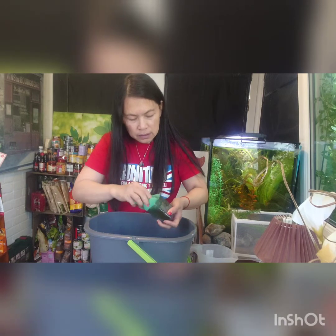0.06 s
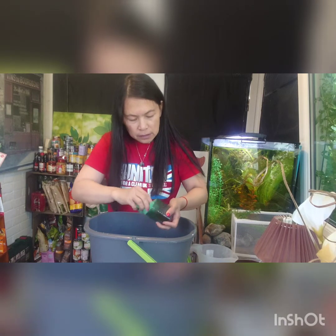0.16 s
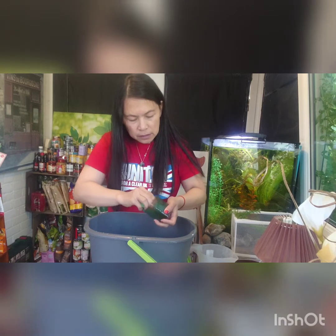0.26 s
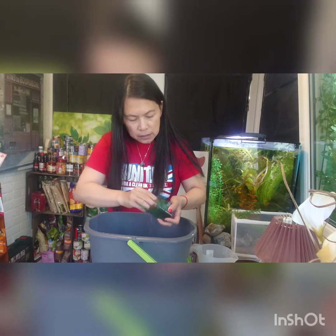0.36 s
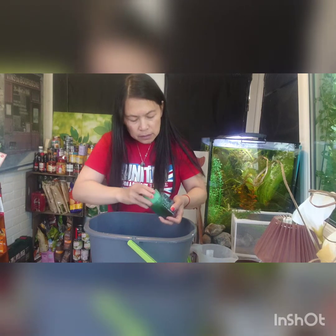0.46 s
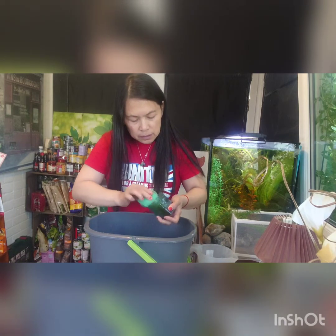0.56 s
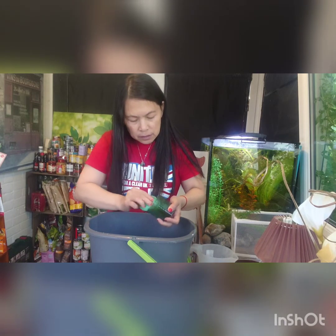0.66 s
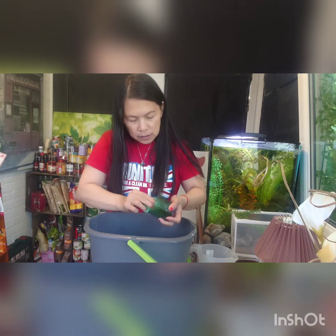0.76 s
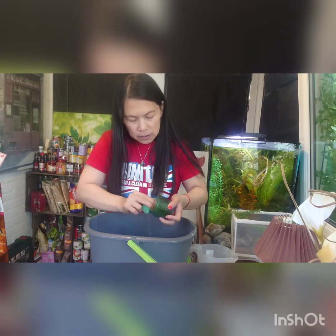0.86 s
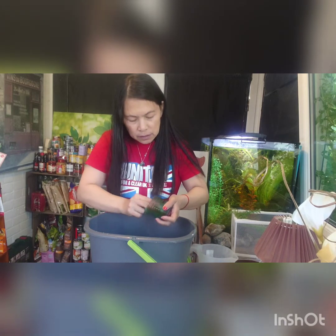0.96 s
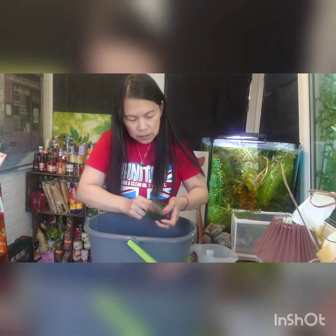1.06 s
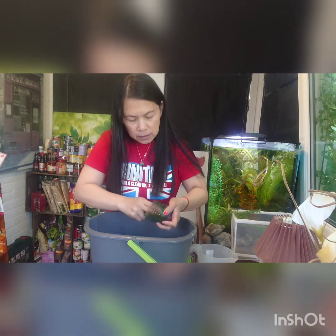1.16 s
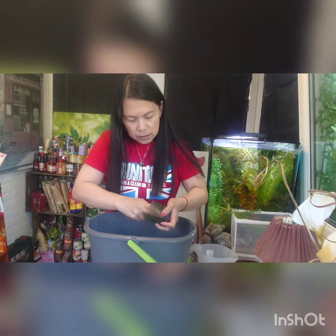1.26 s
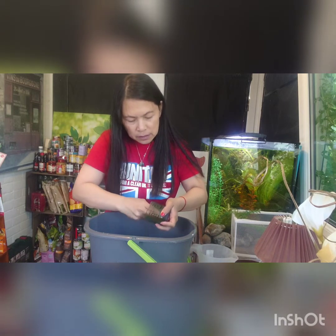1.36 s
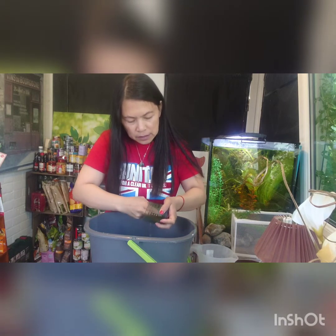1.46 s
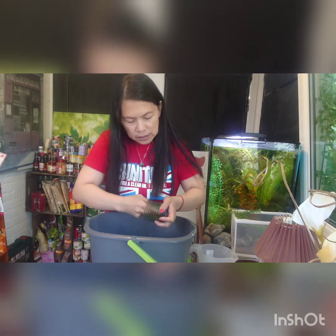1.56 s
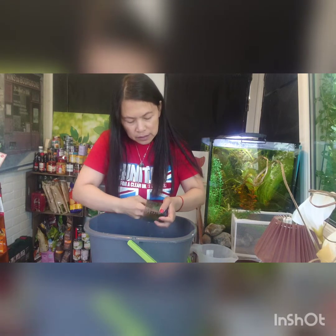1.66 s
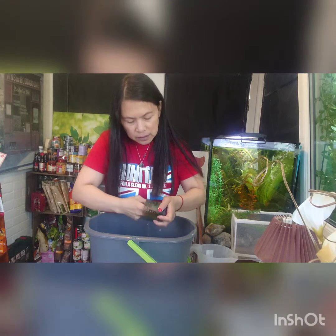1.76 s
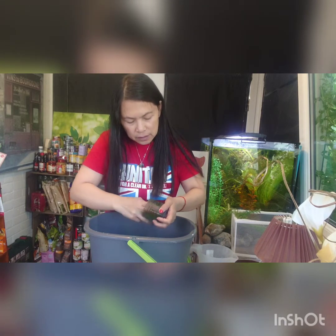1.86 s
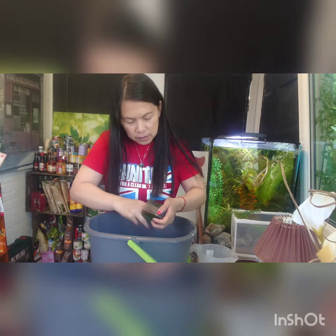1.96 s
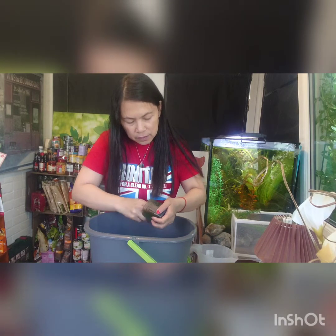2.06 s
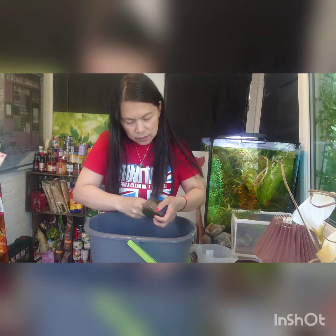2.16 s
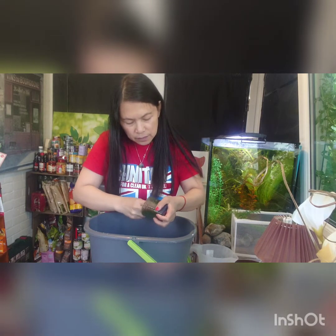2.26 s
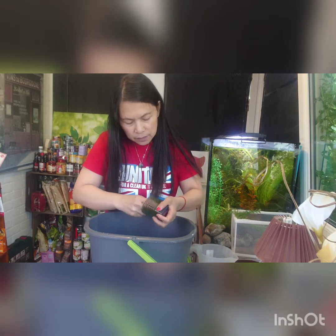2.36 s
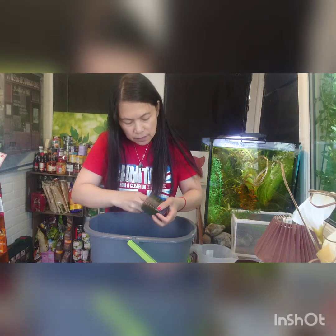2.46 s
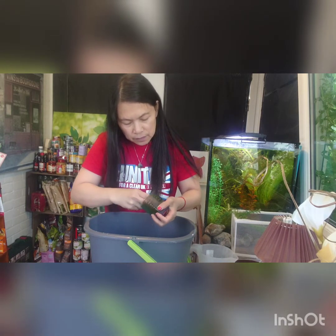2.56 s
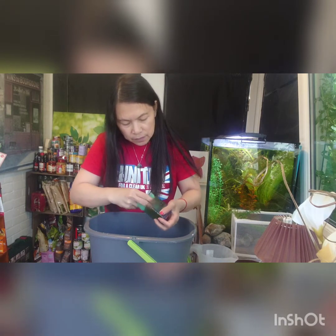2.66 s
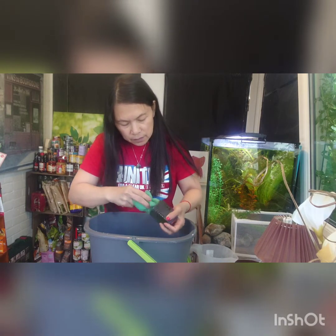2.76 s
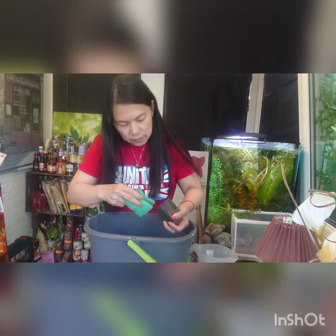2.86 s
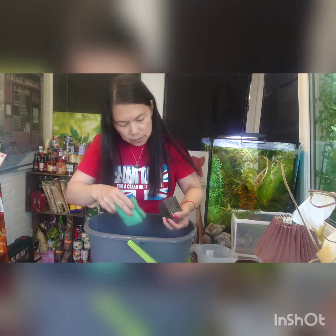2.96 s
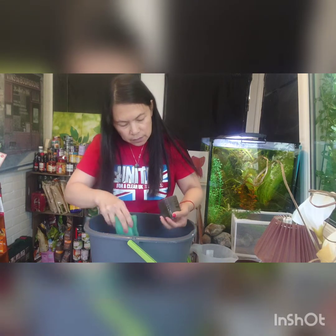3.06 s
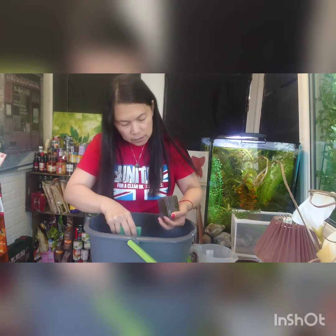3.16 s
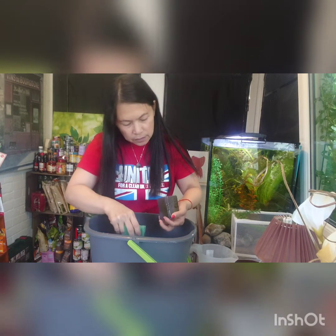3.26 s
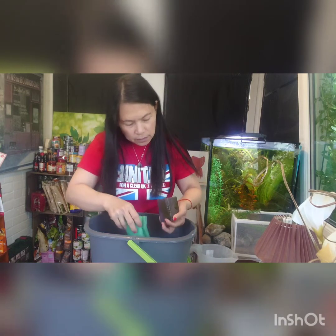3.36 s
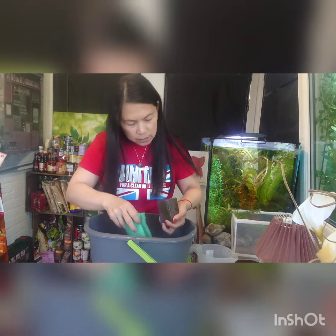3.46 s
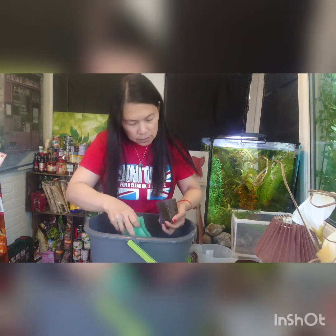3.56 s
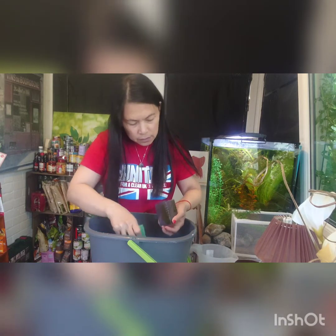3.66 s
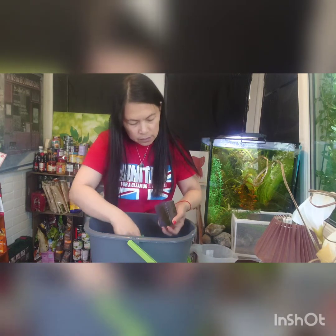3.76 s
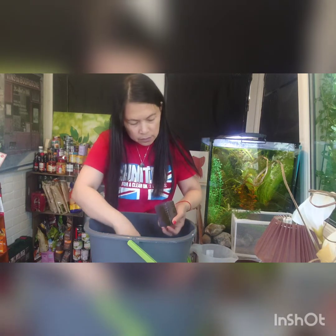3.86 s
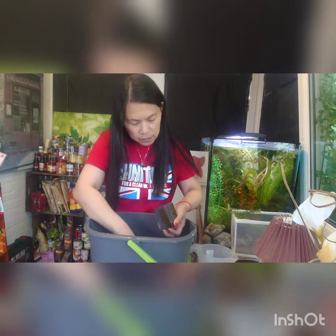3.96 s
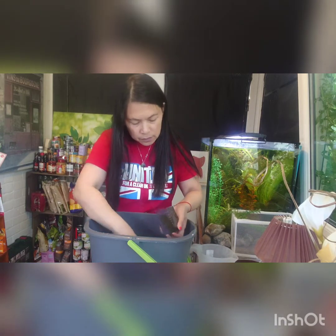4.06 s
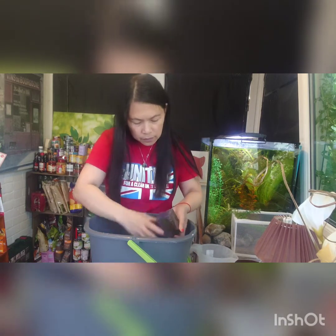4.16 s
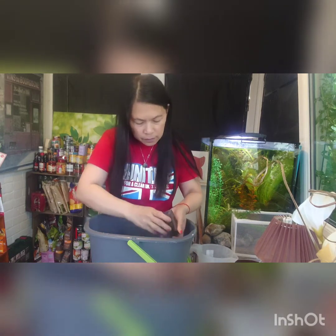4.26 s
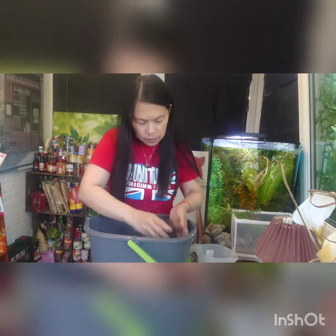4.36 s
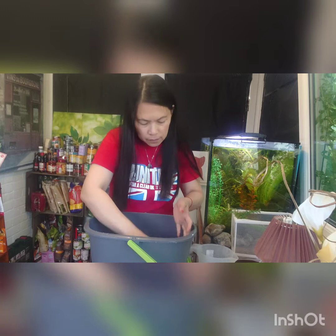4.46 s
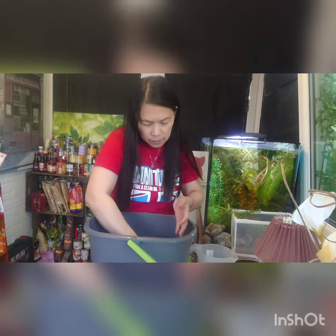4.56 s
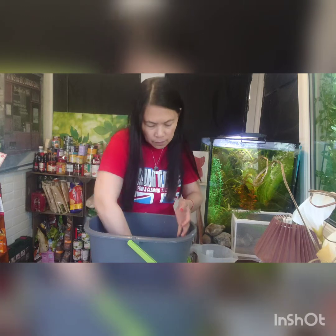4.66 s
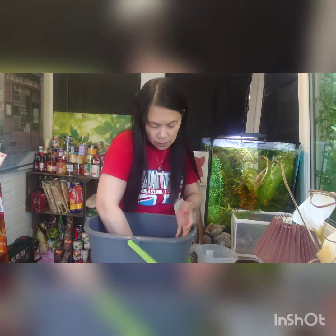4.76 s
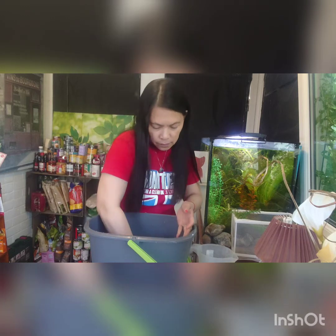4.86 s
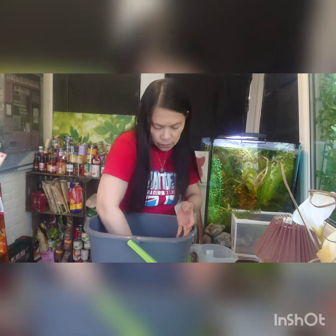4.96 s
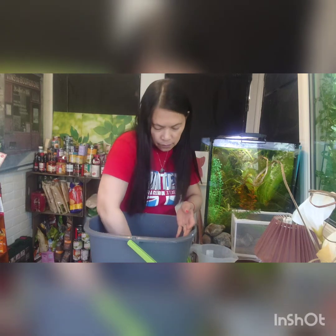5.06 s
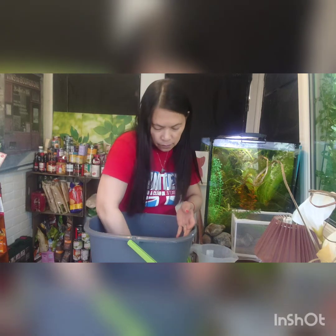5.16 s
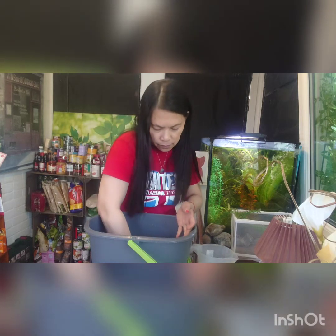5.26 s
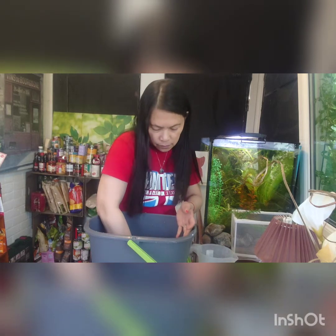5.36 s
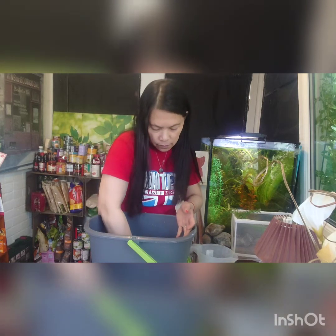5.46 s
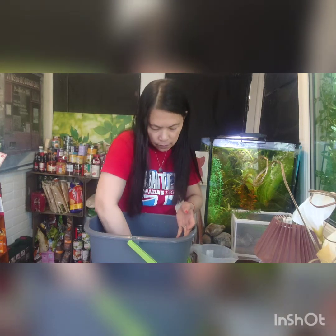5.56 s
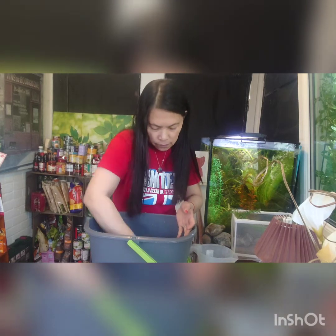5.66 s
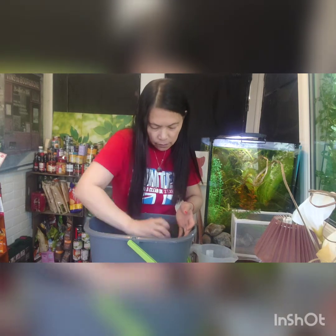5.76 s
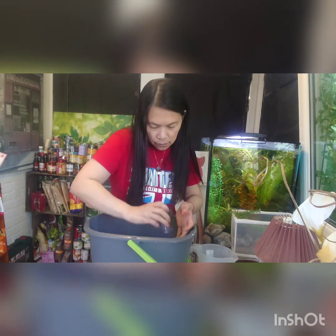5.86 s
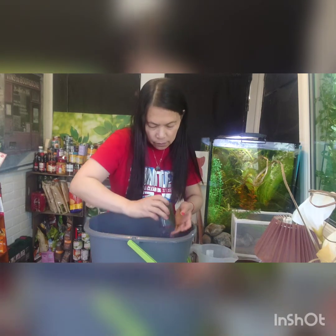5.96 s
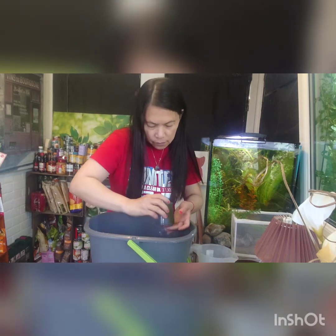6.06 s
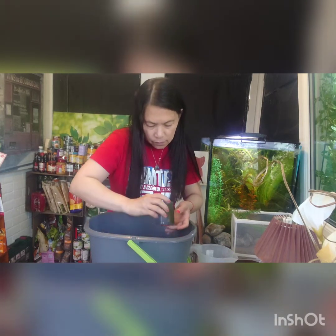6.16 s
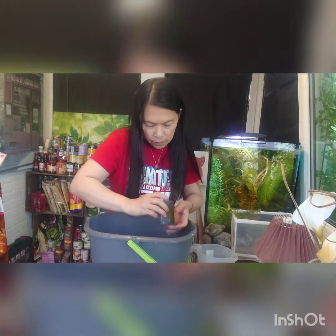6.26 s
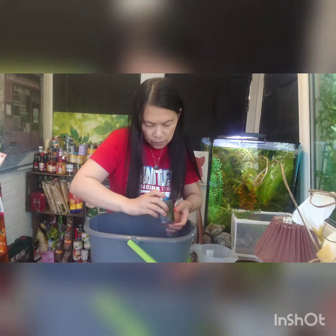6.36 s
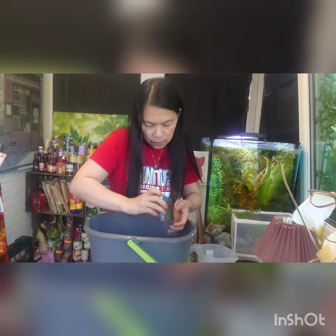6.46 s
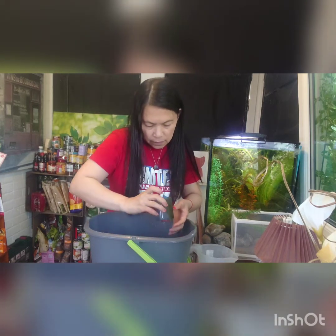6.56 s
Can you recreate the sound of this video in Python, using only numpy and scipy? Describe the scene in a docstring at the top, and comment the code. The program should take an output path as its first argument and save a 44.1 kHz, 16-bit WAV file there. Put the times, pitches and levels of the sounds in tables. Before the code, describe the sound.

Close up in a small furnished room, hands work a wet sponge out of a hollow plastic casing: short ringing knocks, soft squelches, rasps and a few squeaks. After a quieter pause the casing lightly taps the water, then several heavy plunges slosh and gurgle with low bucket thumps. Drips and trickles follow. A bracelet clinks faintly and aquarium pumps hum low throughout.

```python
"""Hands work a wet sponge out of a hollow plastic filter casing: noise through the casing's resonances,
ringing knocks with low thumps, rasps and squeaks. Five plunges into a bucket of water follow, then
dripping: stirred noise, swarms of chirping bubbles and low resonances. A bracelet clinks now and then as
damped high tones. Behind it aquarium pumps hum as steady tones over noise, in a small furnished room."""
import sys
import numpy as np
from scipy import signal
from scipy.fft import rfft, irfft, next_fast_len
from scipy.io import wavfile
from scipy.ndimage import uniform_filter1d, map_coordinates

SR = 44100
rng = np.random.default_rng(int(sys.argv[2]) if len(sys.argv) > 2 else 0)


def master_out(mix):
    """Clip the mix to full scale and print it as 16-bit PCM to the path in sys.argv[1]."""
    frames = np.transpose(np.atleast_2d(mix))
    ceiling = np.clip(frames, -1, 1)
    pcm = np.round(ceiling * 32767).astype(np.int16)
    wavfile.write(sys.argv[1], SR, pcm)


N = 291060
TIME = np.arange(N) / SR
SPAN = np.arange(SR // 3) / SR  # the longest ring or burst, in seconds

# noise colour of wet rubbing and of first contact: frequency [Hz], relative level [dB]
RASP = [(820, -14), (1400, -5), (1820, -7.5), (2070, -3), (2500, -4.5), (4200, -6), (7290, -19),
        (9000, -27.5), (11700, -66), (19800, -120)]
# noise colour of fine hiss and mist: frequency [Hz], relative level [dB]
HISS = [(5290, -29), (9000, -8), (10400, 1), (11300, -1.5), (15100, -4), (15800, -43)]
# churning of the water, then the trickle off the lifted sponge: time_s [s], gurgle_db [dB], spray_db [dB]
CHURN = [(4.752, -58.5, -63.5), (4.765, -31.5, -39.5), (4.85, -50.5, -71), (4.91, -46.5, -56),
         (5.12, -59.5, -70), (5.18, -50, -64), (5.265, -55.5, -66), (5.41, -44.5, -58), (5.54, -55, -59.5),
         (5.6, -45.5, -58), (5.76, -68.5, -69.5), (6.2, -80.5, -80), (6.39, -62, -64), (6.6, -80, -74)]
CHURN_START_S = CHURN[0][0]


def casing():
    """Rubbing excites the hollow casing; each knock rings briefly and squeezes out a burst of wet rasp."""
    # resonances of the casing: centre_hz [Hz], width_hz [Hz], level_db [relative dB]
    hollow_modes = [(904, 45, 6), (734, 39, 1.5), (1093, 180, -1.5), (2090, 230, -12.5)]
    # strokes of the sponge: start_s [s], length_s [s], hollow_db [dB], rasp_db [dB]
    strokes = [(0.085, 0.19, -62.5, -71), (0.302, 0.046, -59.5, -56.5), (0.498, 0.037, -49, -57.5),
               (0.703, 0.036, -64, -61.5), (0.805, 0.055, -61.5, -63.5), (1.056, 0.022, -54, -54.5),
               (1.573, 0.38, -72.5, -90.5), (1.795, 0.0249, -60.5, -60.5), (2.164, 0.026, -61, -70.5),
               (2.72, 0.067, -64.5, -63.5), (2.801, 0.094, -59.5, -58.5), (4.355, 0.017, -58, -90.5),
               (4.486, 0.021, -57.5, -58.5)]
    # fingers busy on the wet sponge, a faint rustle between strokes: time_s [s], level_db [dB]
    rustle_levels = [(0, -74.5), (0.6, -67.5), (1.0, -72), (1.4, -74.5), (1.75, -70), (2.2, -71.5),
                     (2.7, -73), (3.1, -78.5), (4.1, -79), (4.45, -74.5), (4.72, -77.5)]
    # fingers knocking and squelching: start_s [s], level_db [dB], ring_hz [Hz], squelch_db [dB], hiss_db [dB]
    knocks = [(0.128, -50, 907, -66.5, -79), (0.246, -51.5, 906, -72, -75), (0.295, -37, 886, -52, -59.5),
              (0.457, -46, 807, -60, -73), (0.472, -44, 894, -49, -71), (0.507, -51, 1040, -47.5, -70),
              (0.588, -52, 870, -50.5, -68), (0.665, -47.5, 2725, -57.5, -65), (0.8, -49, 815, -60, -75),
              (0.921, -54.5, 800, -57.5, -66), (1.034, -39.5, 890, -48.5, -60),
              (1.146, -42.5, 2030, -41, -51), (1.151, -44, 1476, -60.5, -75), (1.29, -51, 910, -56.5, -74),
              (1.31, -44.5, 2800, -50.5, -60), (1.76, -52, 3700, -60.5, -74),
              (1.795, -45.5, 1175, -52, -56.5), (2.04, -48.5, 4910, -67, -65),
              (2.053, -41, 876, -63.5, -77), (2.186, -44.5, 895, -65, -74), (2.292, -57, 900, -60.5, -77),
              (2.318, -43, 886, -52.5, -77), (2.805, -44.5, 946, -55.5, -64), (2.859, -46, 1293, -59, -62),
              (4.178, -56.5, 4920, -79.5, -67.5)]
    # partials of a knock: ratio [share of the ring pitch], level_db [relative dB]
    knock_partials = [(1, 0), (1.1, -18), (1.4, -19)]

    start_s, length_s, hollow_db, rasp_db = np.transpose(strokes)
    rise, fall = 335, 253.5  # dB per second
    hollow = swells(start_s, length_s, hollow_db, rise, fall)
    rub = swells(start_s, length_s, rasp_db, rise, fall)
    rustle, = curves(rustle_levels)
    hollow = np.hypot(hollow, amp(-4.5) * rustle)
    rub = np.hypot(rub, rustle)

    knock_s, knock_db, ring_hz, squelch_db, hiss_db = np.transpose(knocks)
    rasp = np.hypot(rub, bursts(knock_s, squelch_db, 0.18, rise=0.0045))
    hiss = np.hypot(amp(-8.5) * rub, bursts(knock_s, hiss_db, 0.24, rise=0.0045))
    wide = hollow * rush(modes(hollow_modes), patchy_db=2.5, grain_db=2.0)
    wide += rasp * rush(shape(RASP), patchy_db=3.0, grain_db=1.5)
    wide += hiss * rush(shape(HISS), patchy_db=0.0, grain_db=1.5)

    blur = 0.457 * ring_hz / 1000
    near = sum(rings(knock_s, knock_db + level_db, ring_hz * ratio, 0.055, glide=0.0066, blur=blur)
               for ratio, level_db in knock_partials)
    # pores of the sponge crackle
    near += amp(3) * bubbles(rasp, count=240, hz=2900, spread=0.45, cycles=7.6, skew_db=2.0)
    near += bracelet() + squeaks()
    return wide * tilt(1.3) + room(near, wet_db=-7, right_db=4.5)


def squeaks():
    """Wet plastic squeaks under a finger: short, nearly clean tones."""
    # squeaks: start_s [s], level_db [dB], pitch_hz [Hz], t60_s [s]
    squeak_list = [(0.667, -47, 6060, 0.04), (1.989, -58, 1686, 0.12), (2.815, -52.5, 2030, 0.16),
                   (2.87, -59, 2040, 0.099)]
    start_s, level_db, pitch_hz, t60_s = np.transpose(squeak_list)
    return rings(start_s, level_db, pitch_hz, t60_s, glide=0.0084, blur=0.065)


def water():
    """Stirred water gurgles and sprays; slaps and drips ring as bubbles."""
    # the casing dropped in, slaps and drips on the surface:
    # start_s [s], level_db [dB], bubble_hz [Hz], spray_db [dB], mist_db [dB], t60_s [s, of the bubble]
    drops = [(4.312, -50, 816, -71, -80, 0.049), (4.362, -57.5, 1640, -66, -71, 0.12),
             (4.494, -35, 2205, -66.5, -85, 0.18), (4.758, -27, 1123, -36.5, -53, 0.049),
             (4.799, -22.5, 1375, -56.5, -51, 0.014), (4.869, -34.5, 2910, -43.5, -50, 0.059),
             (4.893, -42, 4550, -41.5, -46, 0.1), (4.969, -32.5, 900, -55, -63, 0.098),
             (4.999, -32, 967, -52, -54, 0.043), (5.058, -42, 1070, -56.5, -69, 0.072),
             (5.142, -44.5, 2000, -68, -79, 0.043), (5.161, -34.5, 2014, -68.5, -70, 0.036),
             (5.193, -32, 984, -52.5, -71, 0.063), (5.277, -26.5, 1700, -48.5, -52.5, 0.02),
             (5.337, -35.5, 894, -44.5, -63, 0.029), (5.364, -30.5, 1117, -47, -54, 0.046),
             (5.427, -33.5, 4660, -47.5, -49.5, 0.028), (5.489, -46, 1122, -70, -75, 0.12),
             (5.554, -30.5, 1012, -57.5, -55, 0.046), (5.615, -36.5, 1704, -40.5, -50.5, 0.061),
             (5.923, -64, 1280, -91, -88, 0.053), (5.958, -55, 1000, -47.5, -50, 0.052),
             (5.986, -47, 978, -59.5, -72, 0.099), (6.051, -40, 6220, -61.5, -59, 0.021),
             (6.057, -55, 2030, -78, -80, 0.056), (6.059, -56.5, 1570, -78, -85, 0.063),
             (6.135, -49, 1420, -61.5, -69, 0.026), (6.196, -49, 3415, -61.5, -70, 0.056),
             (6.216, -43.5, 945, -59, -67, 0.24), (6.298, -67.5, 840, -77.5, -56.5, 0.078),
             (6.307, -58, 3210, -66.5, -59, 0.094), (6.342, -56.5, 750, -51, -57, 0.11),
             (6.359, -50, 1160, -55.5, -72, 0.042), (6.402, -55.5, 4800, -69.5, -73, 0.059),
             (6.406, -47, 3350, -55, -70, 0.081), (6.424, -53.5, 3810, -59.5, -52, 0.067),
             (6.479, -53.5, 5930, -60.5, -53.5, 0.095), (6.534, -40, 1074, -53, -60, 0.08),
             (6.533, -50, 3280, -61, -64, 0.088), (6.554, -52.5, 4170, -56, -75, 0.086)]
    # noise colour of the gurgle: frequency [Hz], relative level [dB]
    gurgle_colour = [(350, -24.5), (600, -6), (794, -5), (874, -3), (1100, -1), (1210, -8), (2250, -4.5),
                     (3500, -11.5), (4550, -23.5), (7700, -120)]
    # noise colour of the spray: frequency [Hz], relative level [dB]
    spray_colour = [(1760, -55), (3000, -16), (3780, -5.5), (4660, 0.5), (7320, -15), (8020, -14.5),
                    (9000, -28), (11700, -55), (19800, -120)]

    gurgle, spray = curves(CHURN)
    start_s, level_db, bubble_hz, spray_db, mist_db, t60_s = np.transpose(drops)
    calm = start_s < CHURN_START_S  # plastic landing on still water scuffs more than it rings
    # small high drops hardly slap
    slap_db = level_db - 6.0 - 6 * np.log2(np.maximum(bubble_hz / 1800, 1)) + 4 * calm
    slap = np.hypot(gurgle, bursts(start_s, slap_db, 0.13, rise=np.where(calm, .003, .0015)))
    fizz = np.hypot(spray, bursts(start_s, spray_db, 0.16, rise=0.001))
    mist = np.hypot(amp(-6.0) * spray, bursts(start_s, mist_db, 0.22, rise=0.0028))
    wide = slap * rush(shape(gurgle_colour), patchy_db=3.0, grain_db=2.0)
    wide += fizz * tilt(0.8) * rush(shape(spray_colour), patchy_db=4.5, grain_db=1.5)
    wide += mist * tilt(1.5) * rush(shape(HISS), patchy_db=1.0, grain_db=-2.1)

    # hard slaps and small drops ring rough
    rough = 0.045 * np.maximum(level_db + 45.5, 0) + 0.18 * (bubble_hz / 1000 - .6)
    near = rings(start_s, level_db - 12 * calm, bubble_hz, t60_s, glide=0.057, blur=rough)
    # the tick of first contact
    tick = bursts(start_s, level_db - 12 - 6 * calm, 0.013, rise=0.00051)
    near += tick * unit(filtered(rng.standard_normal(N), shape(RASP)))
    near += amp(-13.5) * bubbles(slap, count=120, hz=2070, spread=0.6, cycles=15, skew_db=10.0)
    near += bubbles(fizz, count=160, hz=4420, spread=0.45, cycles=69, skew_db=7.0)
    # droplets falling back
    stir = np.hypot(slap, fizz)
    near += amp(-0.5) * bubbles(stir, count=200, hz=2430, spread=0.97, cycles=4.4, skew_db=8.0)
    return (wide + low_thumps()) * tilt(1.4) + room(near, wet_db=-1.5, right_db=3.5)


def low_thumps():
    """Thumps and sloshing drive one set of low resonances; each thump is a push plus a sinking tone."""
    # low resonances: centre_hz [Hz], width_hz [Hz], level_db [relative dB]
    low_modes = [(244.6, 13, 4.5), (305, 39, -2.5), (376.2, 10.4, -1.5), (159, 33, -2), (115, 15, -7),
                 (86.5, 10.3, 0), (70, 37, -4.5), (202, 24, -5.5), (423, 47, -7), (607, 76, -11)]
    # low thumps, the first three under knocks on the casing, the rest as casing and water hit the bucket:
    # start_s [s], level_db [dB], tone_hz [Hz]
    thumps = [(1.145, -47.5, 353), (2.055, -51, 343), (2.316, -57, 353), (4.312, -52, 358),
              (4.494, -49, 320), (4.800, -21.5, 345), (4.822, -23, 275), (4.867, -26, 368),
              (5.008, -23.5, 358), (5.031, -33, 206), (5.195, -30, 410), (5.199, -27, 320),
              (5.363, -31.5, 350), (5.377, -25, 316), (5.426, -40, 302), (5.555, -25.5, 376),
              (5.568, -28, 254), (5.962, -47, 340), (6.052, -50, 330), (6.359, -48, 496), (6.529, -47, 330)]
    # the water heaves after each plunge, then laps three times: crest_s [s], level_db [dB]
    sloshes = [(4.851, -31.5), (5.038, -36), (5.23, -41), (5.406, -31.5), (5.601, -32), (6.03, -56),
               (6.28, -60.5), (6.52, -69.5)]

    start_s, level_db, tone_hz = np.transpose(thumps)
    crest_s, slosh_db = np.transpose(sloshes)
    slosh = swells(crest_s, 0, slosh_db, rise=231, fall=236) * (TIME > CHURN_START_S)
    boom = np.hypot(slosh, bursts(start_s, level_db - 3.5, 0.29, rise=0.0031))
    sinking = rings(start_s, level_db - 1.0, tone_hz, 0.063, glide=-0.13, blur=0.3)
    pushes = np.bincount((start_s * SR).astype(int), amp(level_db + 26), N)

    # sparse random impulses, about 300 a second
    lumps = unit((rng.random(N) < 300 / SR) * rng.standard_normal(N))
    lumpy = filtered(boom * lumps, modes(low_modes)) / np.std(filtered(lumps, modes(low_modes)))
    wash = boom * rush(modes(low_modes), patchy_db=3.5, grain_db=1.3)
    swapped = wash[::-1]  # left and right exchanged
    return 0.41 * lumpy + 0.32 * wash + 0.096 * swapped + sinking + filtered(pushes, modes(low_modes))


def bubbles(stir, count, hz, spread, cycles, skew_db):
    """A crowd of rising chirps that follows the stirring: louder and denser where it is stronger."""
    place, pitch, size = rng.random((count, 3)).T
    busy = np.cumsum(stir ** 0.3 * (stir > 1e-6))
    start_s = np.interp(place, busy / busy[-1], TIME)
    pitch_hz = hz * np.exp(spread * (2 * pitch - 1))
    level_db = 20 * np.log10(stir[(start_s * SR).astype(int)] + 1e-9)
    level_db -= skew_db * np.log(size + 0.031)  # a few stand out
    return rings(start_s, level_db, pitch_hz, cycles / pitch_hz, glide=0.38, blur=0.06)


def bracelet():
    """Small metal links ring at three high modes."""
    # contacts: start_s [s], level_db [dB]
    clinks = [(0.0164, -79), (0.2129, -75), (1.785, -65), (2.236, -75), (4.5012, -73), (4.6286, -61.5),
              (4.6718, -81)]
    # modes of the links: pitch_hz [Hz], level_db [relative dB], t60_s [s]
    link_modes = [(8100, -2, 0.067), (11600, 9.5, 0.11), (14500, -1, 0.058)]
    start_s, clink_db = np.transpose(clinks)
    return sum(rings(start_s, clink_db + level_db, pitch_hz, t60_s, glide=0, blur=0.0085)
               for pitch_hz, level_db, t60_s in link_modes)


def pumps():
    """Slightly unsteady motor tones over steady room and microphone noise."""
    # pump tones: pitch_hz [Hz], level_db [dB rms, before the stereo tilt]
    hum = [(49.5, -58.5), (52.1, -85), (78.1, -77.5), (84.8, -69), (100.2, -81.5), (104.2, -85),
           (130.2, -73), (156.2, -80.5), (172.2, -80), (200.5, -79.5), (208.4, -80), (260.5, -79),
           (300.7, -76), (329.0, -76.5), (372.7, -82.5), (429.2, -81)]
    # colour of the steady noise: frequency [Hz], relative level [dB]
    floor_colour = [(15, -45), (25, -9.5), (64, -4.5), (130, -15), (241, -21), (324, -13), (637, -25),
                    (1150, -33), (5520, -42.5), (6660, -44), (7420, -73), (8970, -70), (9720, -47),
                    (10800, -41), (15800, -35.5)]
    tones = sum(amp(level_db) * np.sqrt(2) * np.sin(2 * np.pi * (pitch_hz * TIME + rng.random()))
                for pitch_hz, level_db in hum)
    tones = amp(0.1 * wobble(2.3)) * tones
    noise = amp(-64) * rush(shape(floor_colour), patchy_db=-0.1, grain_db=0.1)
    return (tones + noise) * tilt(-1.1)


def room(x, wet_db, right_db):
    """Direct sound, a touch earlier on the right, and a noise tail drawn afresh every quarter second."""
    # decay of the furnished room: frequency [Hz], t60_s [s]
    decay = [(200, 0.35), (1000, 0.19), (4000, 0.37), (12000, 0.022)]
    wet, step = np.zeros((2, N + SR)), SR // 4
    for start in range(0, N, step):
        piece = x[start:start + step]
        if not piece.any():
            continue
        hz, t, z = signal.stft(rng.standard_normal((2, SR // 2)), SR, nperseg=256)
        fade = amp(-60 * t / along(decay, hz)[:, None])
        tail = signal.istft(z * fade, SR, nperseg=256)[1]
        echo = signal.fftconvolve(piece[None], tail / np.linalg.norm(tail[0]), axes=1)
        wet[:, start + 150:start + 150 + echo.shape[1]] += echo  # 3.4 ms behind the direct sound
    direct = np.array([np.roll(x, 3), x])
    return (direct + amp(wet_db) * wet[:, :N]) * tilt(right_db / 2)


def rush(response, patchy_db, grain_db):
    """Stereo noise of rms 1 with patches of random gain and millisecond grains."""
    # likeness of left and right: frequency [Hz], correlation [0 to 1]
    alike = [(60, 0.53), (350, 0.48), (650, 0.36), (1100, 0.18), (3000, 0.01)]
    z = signal.stft(rng.standard_normal((2, N)), nperseg=256)[2]
    field = uniform_filter1d(rng.standard_normal(z.shape[1:]), size=2, axis=0)
    field = uniform_filter1d(field, size=12, axis=1)
    pair = signal.istft(z * amp(patchy_db * unit(field)), nperseg=256)[1][:, :N]
    pair = pair * amp(grain_db * wobble(350))

    def mid_side(hz):
        turn = np.arccos(np.clip(along(alike, hz), -1, 1)) / 2
        return response(hz) * np.array([np.cos(turn), np.sin(turn)])

    mid, side = filtered(pair, mid_side)
    return unit(np.array([np.roll(mid + side, 3), mid - side]))  # left three samples late


def rings(starts_s, levels_db, pitches_hz, t60s, glide, blur):
    """Damped tones whose pitch shifts with glide; blur lets the phase wander; long tones start softly."""
    out = np.zeros(N)
    wander = np.cumsum(rng.standard_normal(N + len(SPAN)))
    for start_s, db, hz, t60, loose in np.broadcast(starts_s, levels_db, pitches_hz, t60s, blur):
        t = SPAN[:round(t60 * SR)]
        drift = wander[round(start_s * SR):][:len(t)]
        phase = 2 * np.pi * hz * t * (1 + glide * t / t60)
        phase = phase + loose * np.sqrt(hz / SR) * (drift - drift[0])
        onset = 1 - np.exp(-t / (0.00046 + 0.034 * max(t60 - .1, 0)))
        add(out, start_s, amp(db - 60 * t / t60) * onset * np.sin(phase))
    return out


def bursts(starts_s, levels_db, t60s, rise):
    """Gain curve of sudden bursts that die away, summed as power; rise in seconds."""
    power = np.zeros(N)
    for start_s, db, t60, soft in np.broadcast(starts_s, levels_db, t60s, rise):
        gain = amp(db - 60 * SPAN / t60) * (1 - np.exp(-SPAN / soft))
        add(power, start_s, gain ** 2)
    return np.sqrt(power)


def swells(starts_s, lengths_s, levels_db, rise, fall):
    """Gain curve of movements that rise, hold and fall at steady dB-per-second rates."""
    t = TIME[::32, None]  # a coarse grid is enough
    away_db = np.maximum(rise * (starts_s - t), fall * (t - starts_s - lengths_s)).clip(0)
    return np.interp(TIME, t[:, 0], np.linalg.norm(amp(levels_db - away_db), axis=1))


def curves(rows):
    """Gain per sample for each dB column after the time column; silent outside the table."""
    time_s, *columns = np.transpose(rows)
    return [amp(np.interp(TIME, time_s, db, left=-150, right=-150)) for db in columns]


def modes(table):
    """Response of a body with (Hz, width Hz, dB) resonances of alternating sign."""
    def response(f):
        return sum((-1) ** k * amp(db) * 1j * f * width / (centre ** 2 - f * f + 1j * f * width)
                   for k, (centre, width, db) in enumerate(table))
    return response


def shape(spectrum):
    """Response read from (Hz, dB) points."""
    return lambda hz: amp(along(spectrum, hz))


def filtered(x, response):
    """Sound x times a response of frequency, real or complex."""
    m = next_fast_len(N + SR // 2)
    return irfft(rfft(x, m) * response(np.fft.rfftfreq(m, 1 / SR)), m)[..., :N]


def along(points, hz):
    """Interpolates (Hz, value) points on a log-frequency axis."""
    f, v = np.transpose(points)
    return np.interp(np.log(hz + 1), np.log(f + 1), v)


def wobble(rate):
    """A smooth random curve through rate knots a second."""
    return map_coordinates(rng.standard_normal(int(N * rate / SR) + 4), [TIME * rate])


def add(track, start_s, sound):
    """Mixes a sound into a track at start_s seconds."""
    part = track[round(start_s * SR):][:len(sound)]
    part += sound[:len(part)]


def tilt(db):
    """Stereo gains that lift the right by db and lower the left by as much."""
    return amp([[-db], [db]])


def amp(db):
    """Decibels to linear gain."""
    return 10 ** (np.asarray(db) / 20)


def unit(x):
    """Scales x to rms 1."""
    return x / np.sqrt(np.mean(x ** 2) + 1e-20)


def scene():
    """Sponge and casing, water and low thumps, over the pumps."""
    return casing() + water() + pumps()


def record(dry):
    """The microphone drops the deepest bass, below about 42 Hz; nothing is kept above 15.8 kHz."""
    return filtered(dry, lambda hz: (hz < 15800) / np.sqrt(1 + (42 / (hz + 1)) ** 12))


dry = scene()
out = record(dry)
master_out(out)
```